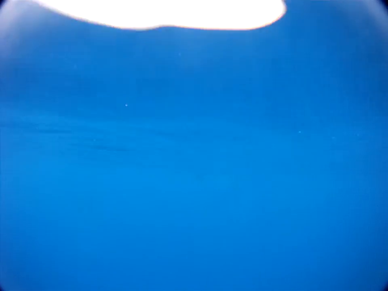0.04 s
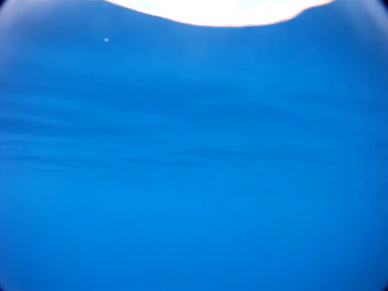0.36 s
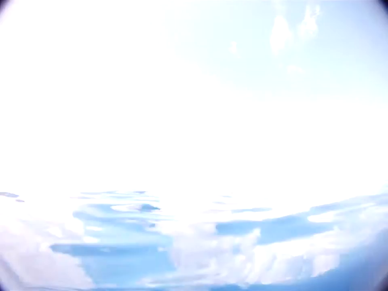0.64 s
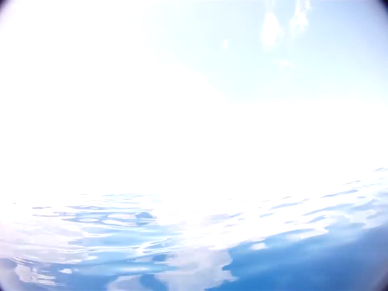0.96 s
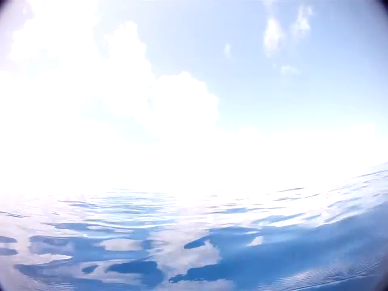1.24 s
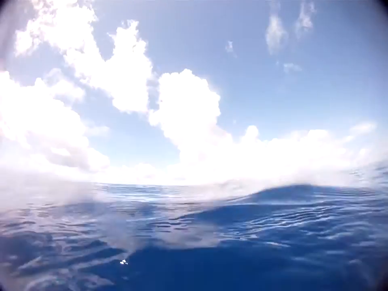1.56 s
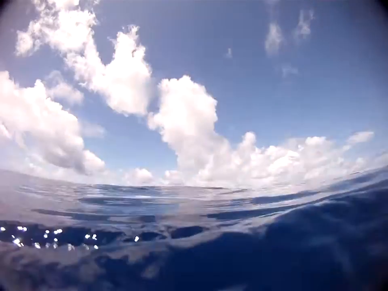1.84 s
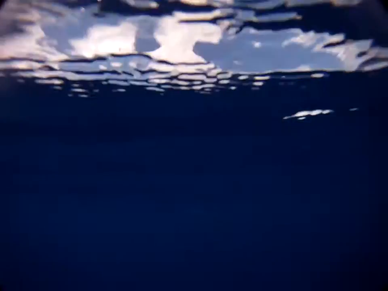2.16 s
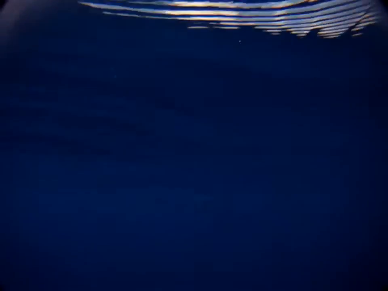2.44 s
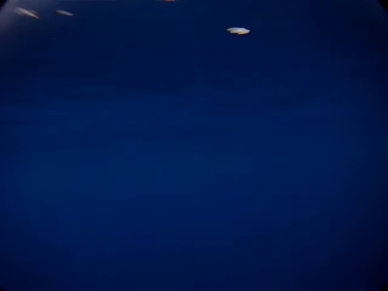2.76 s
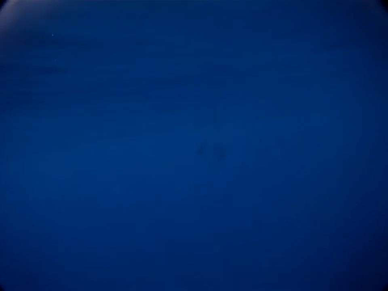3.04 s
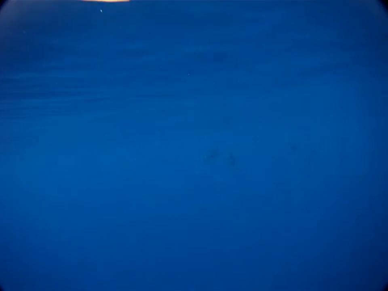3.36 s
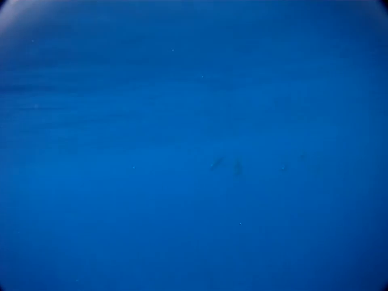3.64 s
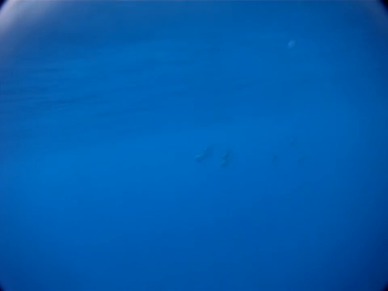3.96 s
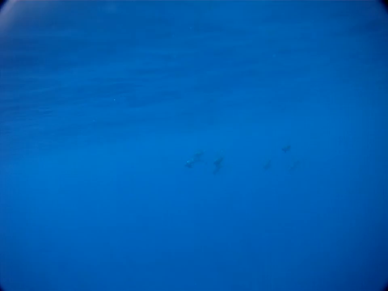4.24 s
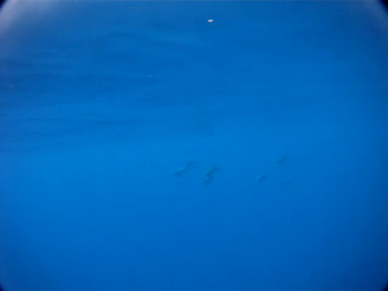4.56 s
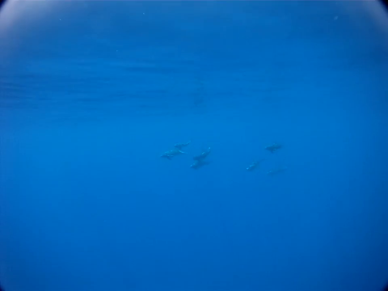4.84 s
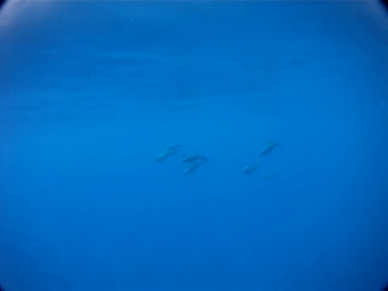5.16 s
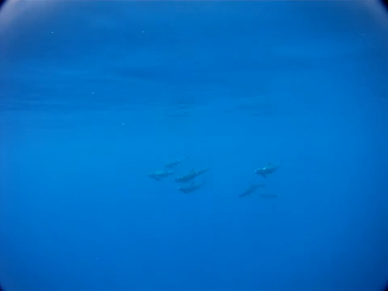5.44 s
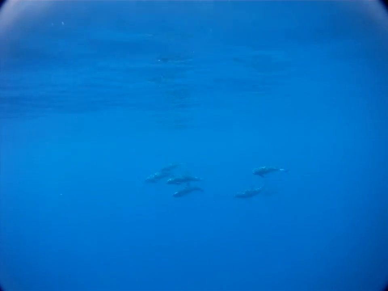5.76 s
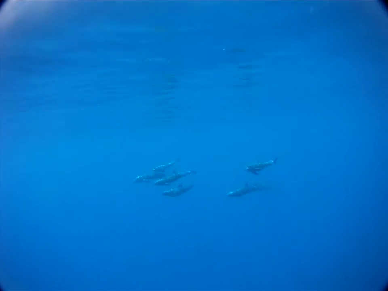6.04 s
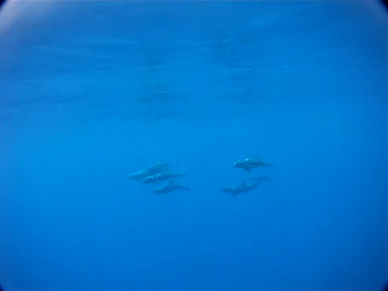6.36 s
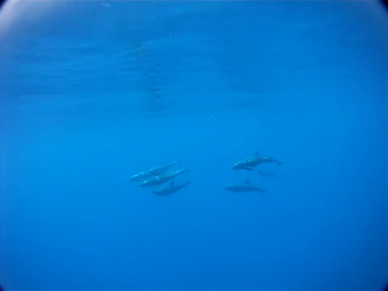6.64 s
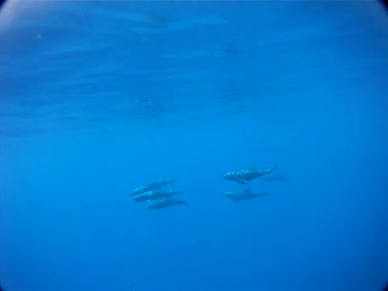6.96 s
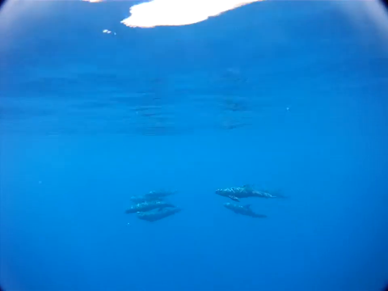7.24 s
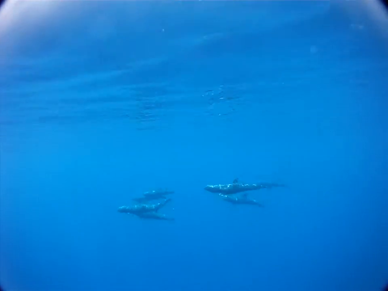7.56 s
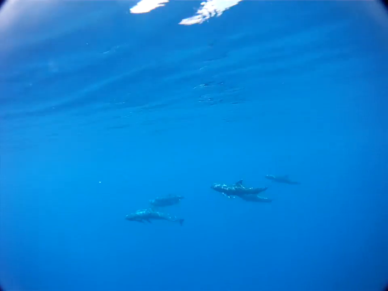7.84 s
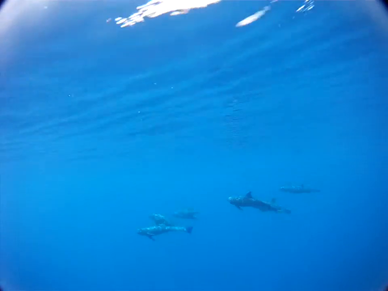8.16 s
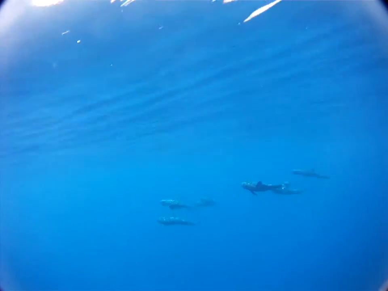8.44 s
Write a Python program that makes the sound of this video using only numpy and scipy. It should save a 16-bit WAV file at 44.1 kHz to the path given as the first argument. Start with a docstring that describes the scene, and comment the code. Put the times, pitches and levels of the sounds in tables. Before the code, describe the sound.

Sea water slaps, drips and fizzes against a small waterproof camera bobbing through the surface, with a couple of rising gurgles. After a last loud splash it sinks, and a pod of dolphins is heard clicking in overlapping trains, faint at first and later a little louder. Each click rings briefly on the case. A low rumble, a hollow swelling drone and a soft hiss lie underneath, with a glassy edge to the treble.

```python
"""A low rumble of water, then slaps, drips and gurgles as a small cased camera bobs through the sea surface.
Each slap traps a ringing bubble, and water fizzes as it runs off the waterproof case. Once it sinks,
the sonar clicks of a pod of dolphins rap on the case and set it ringing, over the rumble of eddies,
a hollow swelling drone and a soft hiss. The camera's coarse sampling adds a glassy treble."""
import sys
import numpy as np
from scipy import signal
from scipy.fft import rfft, irfft, next_fast_len
from scipy.io import wavfile

SR = 44100
rng = np.random.default_rng(int(sys.argv[2]) if len(sys.argv) > 2 else 0)


def output_pcm(signal):
    """Save a mono or channel-first signal as 16-bit PCM at the path in sys.argv[1].

    Samples are clipped to [-1, 1] before scaling.
    """
    pcm = np.clip(np.atleast_2d(signal).T, -1, 1) * 32767
    wavfile.write(sys.argv[1], SR, np.round(pcm).astype(np.int16))


N = 384111
HOLD_HZ = 12000  # the camera's coarse sampling rate

# modes the case rings with under a click: f/Hz, level/dB, t60/s
CASE_MODES = [(487.3, 20, 0.015), (1114, 3.5, 0.037), (1354, 3, 0.014), (1496, 9.5, 0.015),
              (2093, 6.5, 0.014), (2248, 6, 0.017), (2280, -31, 0.0062), (3070, 6, 0.0064),
              (3150, 7, 0.0017)]


def gain_of(db):
    """Decibels to amplitude."""
    return 10 ** (np.asarray(db) / 20)


def evened(x):
    """Scales to an rms of one."""
    return x / np.sqrt(np.mean(x ** 2) + 1e-20)


def add(mix, start_s, sound):
    """Mixes a sound in at a time."""
    part = mix[max(round(start_s * SR), 0):][:len(sound)]
    part += sound[:len(part)]


def curve(rows):
    """An envelope of straight lines through rows of t/s, value."""
    return np.interp(np.arange(N) / SR, *np.transpose(rows))


def noise(spectrum):
    """Steady noise of rms one, coloured by rows of f/Hz, level/dB and cut off at half the hold rate."""
    size = next_fast_len(N, True)
    hz = np.fft.rfftfreq(size, 1 / SR)
    points_hz, db = np.transpose(spectrum)
    colour = gain_of(np.interp(np.log(hz + 1), np.log(points_hz), db)) * (hz < HOLD_HZ / 2)
    return evened(irfft(rfft(rng.standard_normal(size)) * colour, size)[:N])


def wander(rate_hz):
    """Random drift of rms one, mostly slower than the given rate."""
    hz = np.fft.rfftfreq(N, 1 / SR)
    return evened(irfft(rfft(rng.standard_normal(N)) / (1 + (hz / rate_hz) ** 4), N))


def water(hiss_db=-65, lumps_db=3.0, flutter_db=1.5):
    """Eddies rumble on the case, a hollow drone swells and fades, and a soft hiss lies under both."""
    # tone colours of the three beds: f/Hz, level/dB
    rumble_colour = [(12, -9.5), (25, 2), (55, -1.5), (110, -13.5), (250, -19.5), (700, -31.5),
                     (1500, -53.5)]
    drone_colour = [(150, -17.5), (310, -10), (420, 0), (560, 0.5), (680, 1.5), (740, -23), (930, -25),
                    (1005, -2), (1190, -22), (1400, -8), (1620, -23.5), (1800, -14.5), (1890, -1.5),
                    (1980, -18.5), (2450, -22), (2700, -33.5)]
    hiss_colour = [(200, 6.5), (800, 4.5), (2100, 3.5), (2900, -2.5), (4800, -2), (6000, -9.5)]
    # buffeting of the eddies and swell of the drone: t/s, level/dB
    eddies = [(0, -55), (.62, -43), (.85, -56.5), (1.4, -55.5), (2.5, -50), (3.45, -55.5), (3.8, -55.5),
              (4.5, -58.5), (4.68, -50.5), (5.25, -54.5), (6.9, -55), (8.71, -55.5)]
    swell = [(0, -65), (.6, -66.5), (1.1, -74), (2.25, -65), (2.6, -58.5), (3.6, -59.5), (4.2, -62),
             (4.55, -66), (4.8, -60), (5.4, -53), (6.25, -52.5), (6.6, -57), (6.9, -70), (7.2, -69.5),
             (7.6, -63), (8.71, -59)]
    rumble = noise(rumble_colour) * gain_of(curve(eddies) + lumps_db * wander(rate_hz=35))
    drone = noise(drone_colour) * gain_of(curve(swell))
    hiss = noise(hiss_colour) * gain_of(hiss_db + flutter_db * wander(rate_hz=39))
    return rumble + drone + hiss


def trickle(fizz_db=-4, sheet_db=-3, pops_per_s=420, scatter_db=5, decay_cycles=5.0, sizes=24):
    """Tiny bubbles of many sizes fizz in the sheet of water running off the case."""
    # water draining off the case while it is in the air: t/s, level/dB
    drain = [(.45, -80), (.62, -44), (.85, -54), (1.15, -58.5), (1.45, -69), (1.58, -50), (1.75, -63.5),
             (2.1, -58), (2.3, -84.5)]
    t, fizz = np.arange(1400) / SR, np.zeros(N)
    for hz in np.geomspace(1200, 3600, sizes):
        bubble = np.exp(-hz * t / decay_cycles) * np.sin(2 * np.pi * hz * t)
        pops = rng.random(N) < pops_per_s / sizes / SR
        strength = gain_of(scatter_db * np.minimum(rng.exponential(1, N), 3))
        fizz += signal.oaconvolve(pops * strength, bubble)[:N]
    sheet = noise([(500, -17.5), (1000, -4.5), (1250, -4.5), (1950, 2.5),
                   (2400, -13), (3050, -7), (3500, -15), (6000, -18)])
    return gain_of(curve(drain)) * (gain_of(fizz_db) * evened(fizz) + gain_of(sheet_db) * sheet)


def splashes(ring_db=2, slap_db=-1, rise_cycles=0.47, slap_s=0.0023, glide_per_s=0.99, wobble_depth=0.048):
    """Each slap of water traps a wobbling bubble that rings a little sharper as it dies."""
    # the case surfaces and drips, takes a wave, then plunges under:
    # t/s, level/dB, bubble f/Hz, t60/s, slap offset/dB
    slaps = [ (.5605, -32.5, 1625, 0.049, -4), (0.5951, -4.5, 2285, 0.029, -15.5),
             (0.5985, -11.5, 2750, 0.015, -16), (0.6004, -13.5, 933, 0.024, -25),
             (0.6161, -15, 1350, 0.034, -4), (0.6225, -12, 1703, 0.046, -9.5),
             (.660, -13, 2280, 0.012, -18), (0.6592, -23, 5820, 0.016, -14),
             (.666, -31.5, 1390, 0.092, -15), (0.683, -33.5, 2540, .022, 9), (0.777, -38, 2630, 0.021, 0.5),
             (.799, -29.5, 5450, 0.0052, -10), (0.9806, -15, 1142, 0.021, -25),
             (1.028, -46.5, 2970, 0.0089, 5), (1.539, -29, 1970, .07, -3), (1.5531, 4.5, 2920, .0105, -13),
             (1.5643, 5.5, 1490, .008, -11), (1.566, 10, 1900, .0068, -10), (1.5707, 2, 1990, .018, -9),
             (1.6099, -10, 1250, .016, -13), (1.627, -28, 1695, .04, -7), (1.638, -17.5, 3480, .009, 0),
             (1.776, -44.5, 3460, 0.0092, 4), (1.828, -34, 2020, 0.018, -6),
             (1.941, -44.5, 1075, .012, 8.5), (2.025, 2.5, 1130, 0.0048, -10.5),
             (2.026, -4.5, 282, 0.0088, -34), (2.028, -26, 664, 0.065, -14), (2.063, -39, 1060, 0.044, -2),
             (2.094, -24.5, 3150, .0082, 3), (2.1101, -31, 1300, .03, 3), (2.1191, -22.5, 1370, 0.05, 4),
             (2.1327, -20.5, 1780, .027, 5.5), (2.1453, -6, 1290, .013, 2), (2.154, -6, 2054, 0.021, -3.5),
             (2.1571, 12.5, 1413, .011, -9), (2.173, -29.5, 3082, 0.023, -9),
             (4.1217, -32, 2050, 0.03, -16)]
    t, out = np.arange(4400) / SR, np.zeros(N)
    spray = noise([(60, -0.5), (450, -14), (900, 2.5), (2800, -5.0), (3600, -7.5), (6000, -10.0)])
    burst = np.exp(-t / slap_s)
    wobble = wobble_depth * wander(rate_hz=510)  # a bubble changes shape, and with it its pitch
    for start_s, db, hz, t60, wet_db in slaps:
        now = slice(round(start_s * SR), round(start_s * SR) + len(t))
        pitch = hz * (1 + glide_per_s * t + wobble[now])
        ring = gain_of(ring_db - 60 * t / t60) * np.sin(2 * np.pi * np.cumsum(pitch) / SR)
        slap = gain_of(wet_db + slap_db) * burst * spray[now]
        attack = 1 - np.exp(-t * hz / rise_cycles)
        add(out, start_s, gain_of(db) * attack * (ring + slap))
    low_cut = signal.butter(1, 120, "highpass", fs=SR, output="sos")  # small bubbles radiate little bass
    return signal.sosfilt(low_cut, out)


def gurgles():
    """Two larger bubbles chirp upward as they near the surface."""
    # one glide for each bubble: t/s, f/Hz, level/dB
    glides = [
        [(.691, 580, -40), (.715, 652, -39.5), (.727, 810, -34), (.735, 954, -21.5), (.745, 1130, -39),
         (.755, 1680, -34)],
        [(2.182, 1075, -16), (2.194, 1160, -34.5), (2.205, 1214, -35), (2.238, 1580, -53)],
    ]
    out = np.zeros(N)
    for glide in glides:
        times, hz, db = np.transpose(glide)
        t = np.arange(times[0], times[-1], 1 / SR)
        tone = np.sin(2 * np.pi * np.cumsum(np.interp(t, times, hz)) / SR)
        envelope = gain_of(np.interp(t, times, db)) * signal.windows.tukey(len(t), .03)
        add(out, times[0], envelope * tone)
    return out


def case_ring(t, centre_hz, spread_hz, rise_s, mode_gains=1):
    """A blow rings the case, favouring the modes near its centre frequency."""
    hz, db, t60 = np.transpose(CASE_MODES)[:, :, None]
    modes = gain_of(db - 60 * t / t60) * np.sin(2 * np.pi * hz * t)
    weights = mode_gains / (1 + ((hz[:, 0] - centre_hz) / spread_hz) ** 2)
    attack = 1 - np.exp(-t / rise_s)
    return attack * (weights @ modes)


def far_pod(gain_db=-60, clicks_per_s=14, start_s=2.35):
    """Distant dolphins tick faintly on the case once it has sunk."""
    ring = case_ring(np.arange(1400) / SR, centre_hz=2200, spread_hz=600, rise_s=.0004)
    sunk = np.arange(N) / SR > start_s
    hits = (rng.random(N) < clicks_per_s / SR) * rng.uniform(1, 3.7, N)
    return gain_of(gain_db) * signal.oaconvolve(sunk * hits, ring)[:N]


def sonar_clicks():
    """Yields the dolphins' clicks one by one; gap and level glide evenly within each train."""
    # bright scans, hollow knocks and two short buzzes from the passing pod: start/s, end/s, clicks,
    # gap growth/s per click, first level/dB, last level/dB, ring centre f/Hz, tick offset/dB
    trains = [ (2.4034, 2.7425, 4, .0033, -56, -50, 2150, -21),
              (2.8558, 3.4164, 6, .0036, -48, -44, 2400, -23),
              (3.5442, 3.8387, 4, -.0089, -43, -43, 2490, -23),
              (3.9302, 4.2748, 5, -.0004, -43, -46, 2400, -19),
              (4.3557, 4.7472, 5, .0087, -46, -50, 2200, -19),
              (4.8755, 5.0990, 3, -.0049, -49, -56, 2100, -20),
              (5.2123, 5.6902, 5, .0102, -55, -53, 2050, -20),
              (2.8400, 3.2630, 5, -.0015, -53, -48, 2150, -11),
              (3.3562, 3.8878, 7, .0012, -47, -47.5, 2030, -11),
              (3.9758, 4.5547, 8, .0001, -48.5, -47.5, 1900, -11),
              (4.6422, 5.1248, 6, .0046, -51, -50.5, 1900, -13),
              (2.7711, 3.3078, 6, -.0087, -53, -49, 1600, -13),
              (3.3955, 4.0262, 8, -.0019, -47, -48.5, 1870, -12),
              (4.1171, 4.2943, 3, -.0118, -44.5, -51, 2000, -12),
              (4.3970, 4.7647, 5, .0004, -49, -53, 1980, -14),
              (2.8170, 3.3900, 6, -.003, -53, -50, 1850, -12),
              (3.7584, 4.3880, 8, .001, -51, -51, 1850, -12),
              (5.7178, 6.0484, 5, .0012, -50, -45.5, 1700, -11),
              (6.1429, 6.3521, 3, .0042, -46.5, -41.5, 1700, -18),
              (6.4634, 7.1115, 7, -.0017, -44, -46.5, 1570, -21),
              (7.2178, 7.4612, 3, .0248, -47, -46.5, 1650, -24),
              (7.5965, 7.9070, 3, .0239, -41.5, -40, 1680, -23),
              (8.0858, 8.5868, 3, .0796, -38.5, -38.5, 1700, -22),
              (6.0743, 6.4217, 4, .0041, -49.5, -46, 2150, -25),
              (6.5360, 7.2000, 7, .0028, -47.5, -49.5, 2250, -22),
              (7.3155, 7.5478, 3, .0033, -46, -50.5, 2200, -24),
              (6.6697, 6.8940, 3, -.0163, -47, -49, 2350, -25),
              (7.2486, 8.1204, 8, .0058, -51, -45.5, 2280, -23),
              (7.7675, 8.1984, 4, .0004, -50, -44, 2270, -23),
              (8.3996, 8.6477, 3, .0205, -42, -44.5, 2150, -24),
              (6.0181, 6.1313, 2, 0, -45, -47, 1720, -21), (7.5320, 7.6881, 2, 0, -48, -43.5, 1620, -21),
              (7.7305, 8.0285, 5, .0075, -52, -51, 1850, -20), (8.2146, 8.3597, 2, 0, -50, -48, 1680, -20),
              (7.2927, 7.3845, 8, .0006, -45, -49, 1300, -20), (7.5967, 7.6702, 8, 0, -39, -42, 1160, -21)]
    for start_s, end_s, count, growth_s, first_db, last_db, centre_hz, sharp_db in trains:
        k = np.arange(round(count))
        times = np.linspace(start_s, end_s, len(k)) - growth_s * k * k[::-1] / 2
        for click_s, db in zip(times, np.linspace(first_db, last_db, len(k))):
            yield click_s, db, centre_hz, sharp_db


def dolphins(ring_db=-1, tick_db=1, rasp_db=-7, scatter_db=3.0, rise_s=0.00031, snap_s=0.001):
    """Each click snaps on the case and rings it; the surface mirrors the ring a moment later."""
    echo_gain, longest_echo_s = .4, 0.001463
    t, out = np.arange(1400) / SR, np.zeros(N)
    head = round(.004 * SR)  # the layers are balanced on their first 4 ms
    tick = noise([(1500, -33.5), (4000, -8), (4700, 2.5), (5400, 16)])
    rasp = noise([(1200, 0), (2500, 10.5), (3200, -20), (4600, -12)])
    snap = np.exp(-t / snap_s) * (1 - np.exp(-t / rise_s))
    for click_s, level_db, centre_hz, sharp_db in sonar_clicks():
        scatter = gain_of(scatter_db * rng.standard_normal(len(CASE_MODES)))
        ring = case_ring(t, centre_hz, spread_hz=550, rise_s=rise_s, mode_gains=scatter)
        lag = round(rng.uniform(0.08, 1) * longest_echo_s * SR)
        ring = ring - echo_gain * np.pad(ring, (lag, 0))[:len(t)]  # the mirror flips the sign
        grain = slice(round(click_s * SR) - len(t), round(click_s * SR))
        layers = [(ring_db, ring), (rasp_db, rasp[grain] * snap), (sharp_db + tick_db, tick[grain] * snap)]
        for db, layer in layers:
            add(out, click_s, gain_of(level_db + db) * layer / layer[:head].std())
    low_cut = signal.butter(4, 910, "highpass", fs=SR, output="sos")  # the stiff case passes few lows
    return signal.sosfilt(low_cut, out)


def scene():
    """Everything reaches one microphone inside the case."""
    return (water() + trickle() + dolphins() + far_pod() + splashes() + gurgles())[None]


def record(dry):
    """The slaps overload the input; holding each coarse sample mirrors the sound around the hold rate."""
    hz = np.fft.rfftfreq(N, 1 / SR)
    overloaded = np.clip(dry, -1, 1)
    passband = np.clip((HOLD_HZ / 2 + 100 - hz) / 600, 0, 1)
    band = irfft(rfft(overloaded) * np.sin(np.pi / 2 * passband) ** 2, N)
    mirrored = band * (1 + 2 * np.cos(2 * np.pi * HOLD_HZ * np.arange(N) / SR))
    held = irfft(rfft(mirrored) * np.sinc(hz / HOLD_HZ), N)
    high_cut = signal.firwin(511, 16150, window=("kaiser", 9), fs=SR)
    return signal.oaconvolve(held, high_cut[None], "same")


dry = scene()
out = record(dry)
output_pcm(out)
```